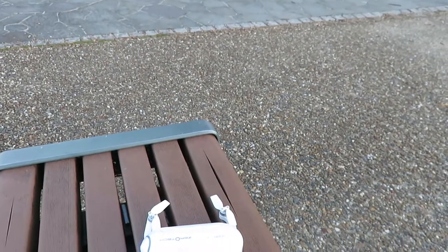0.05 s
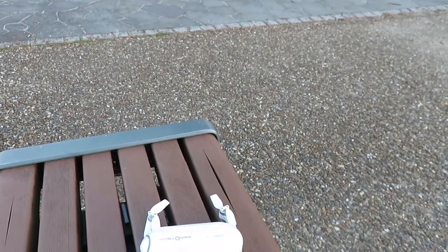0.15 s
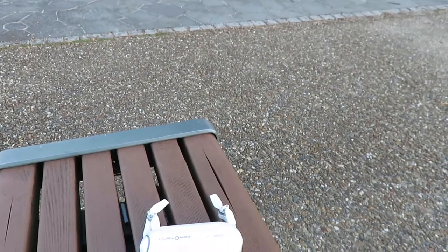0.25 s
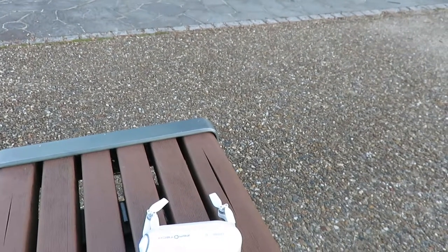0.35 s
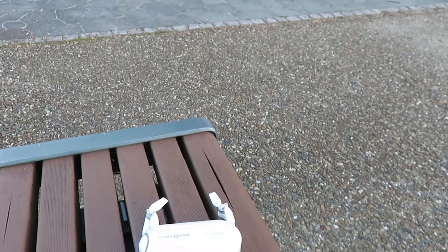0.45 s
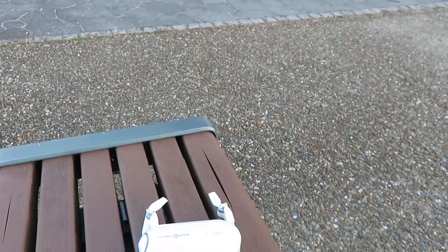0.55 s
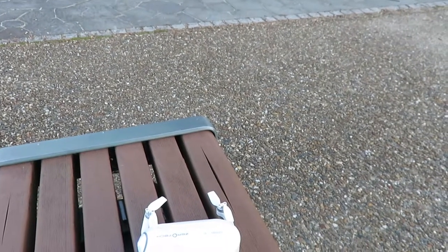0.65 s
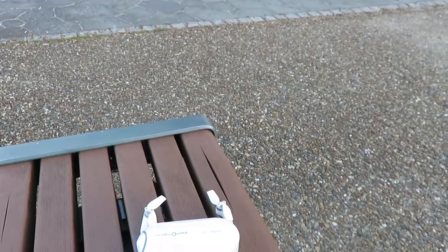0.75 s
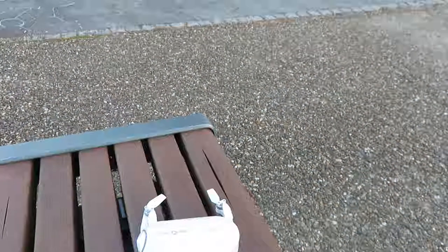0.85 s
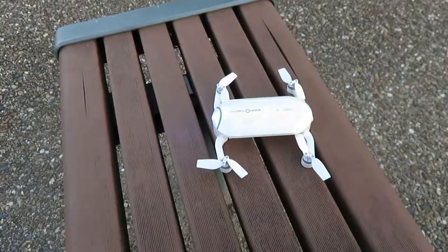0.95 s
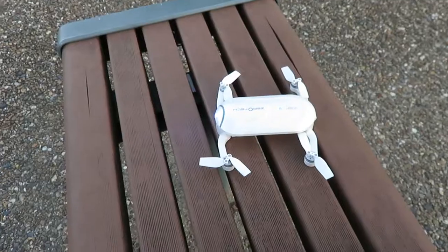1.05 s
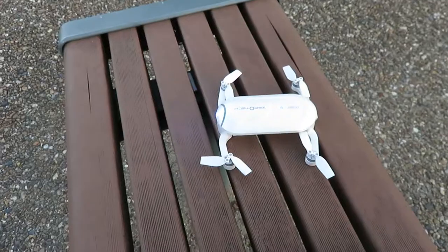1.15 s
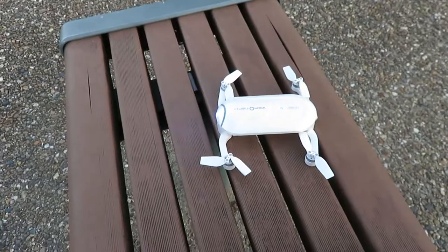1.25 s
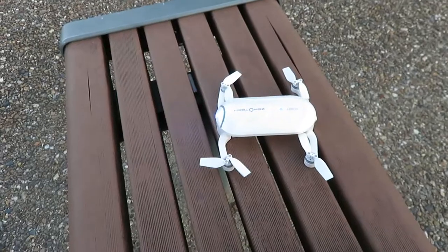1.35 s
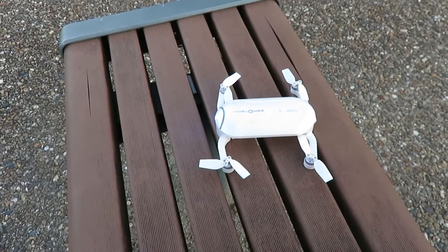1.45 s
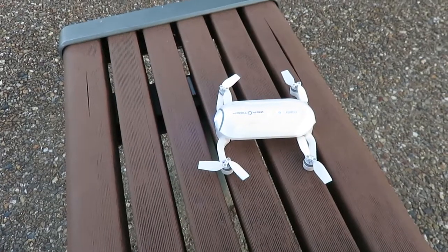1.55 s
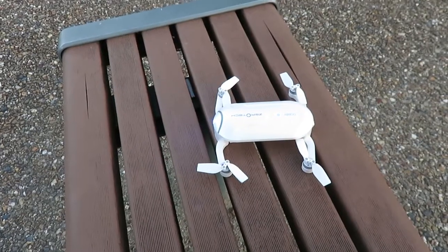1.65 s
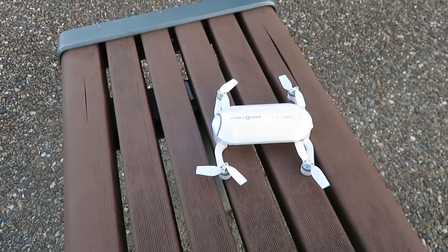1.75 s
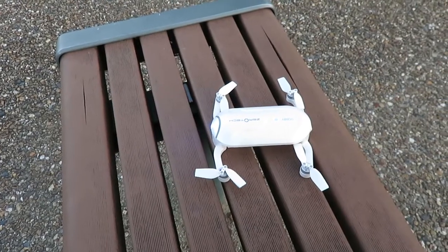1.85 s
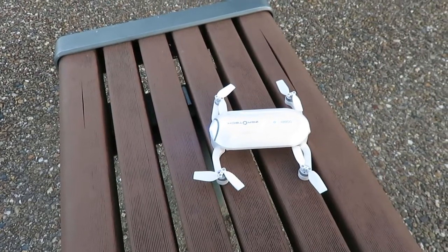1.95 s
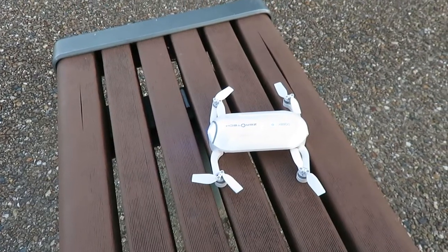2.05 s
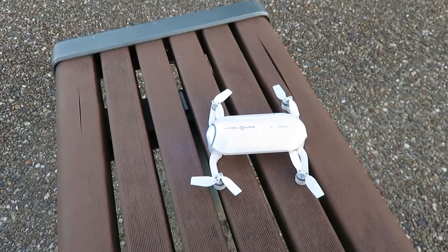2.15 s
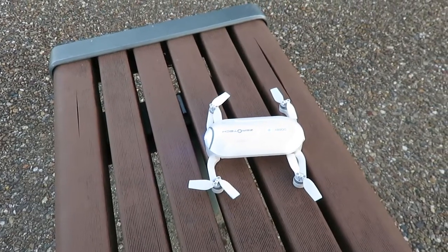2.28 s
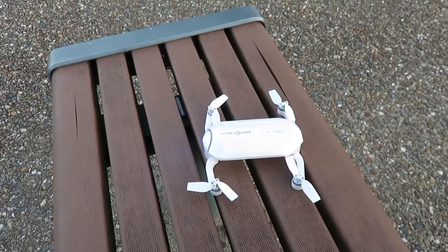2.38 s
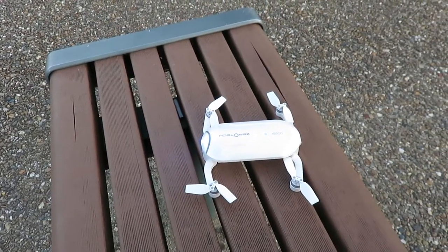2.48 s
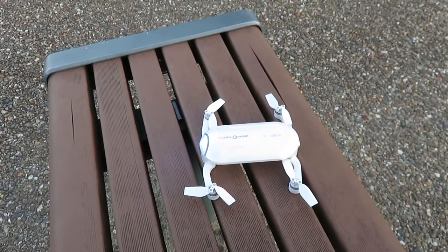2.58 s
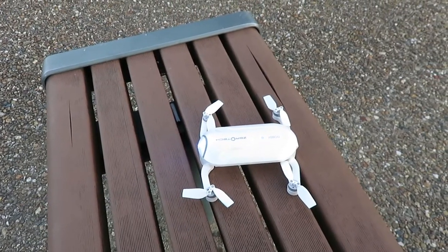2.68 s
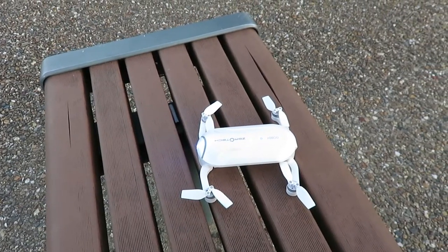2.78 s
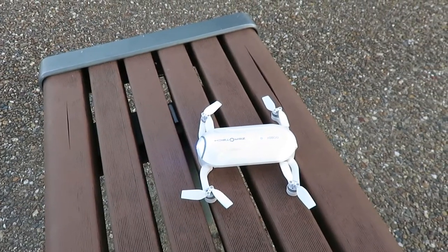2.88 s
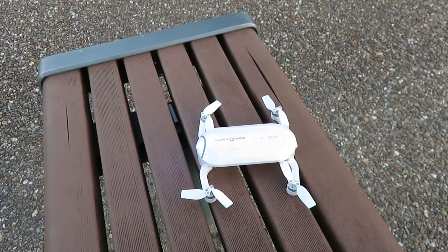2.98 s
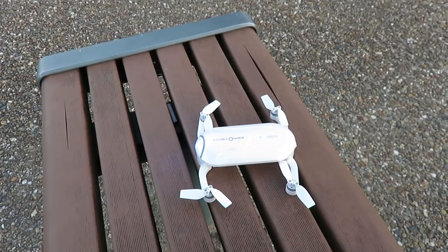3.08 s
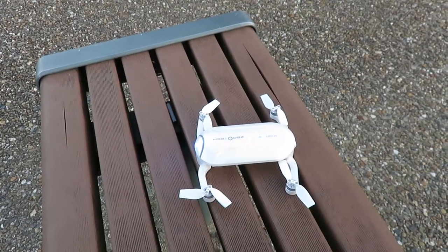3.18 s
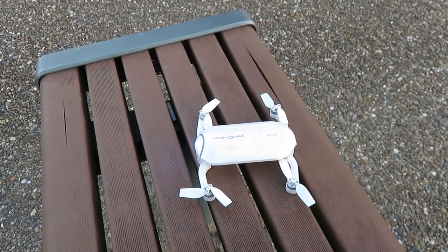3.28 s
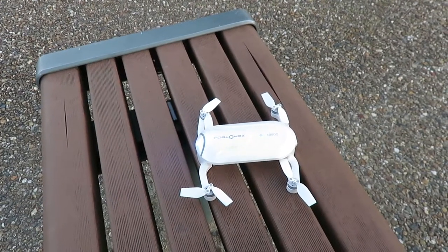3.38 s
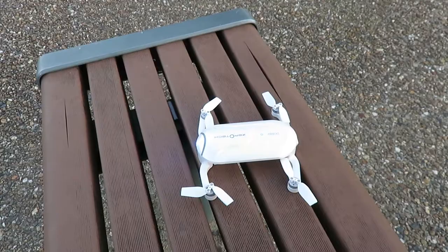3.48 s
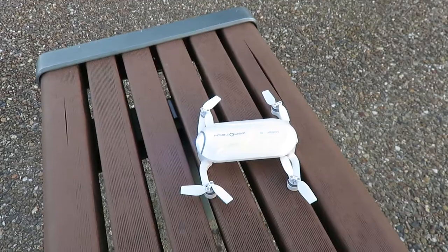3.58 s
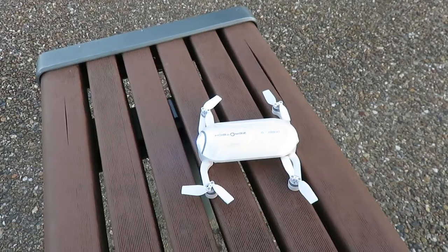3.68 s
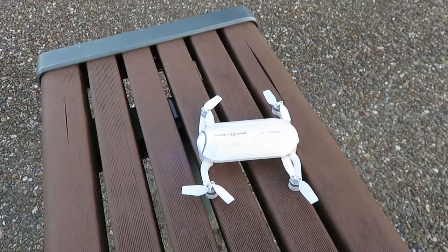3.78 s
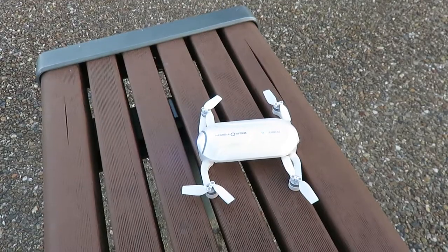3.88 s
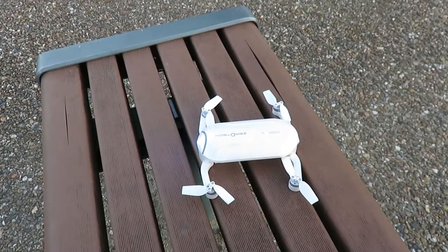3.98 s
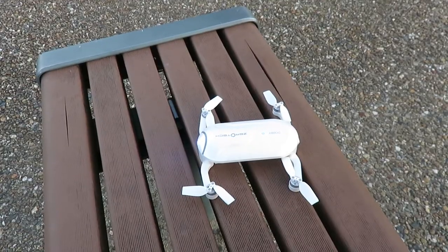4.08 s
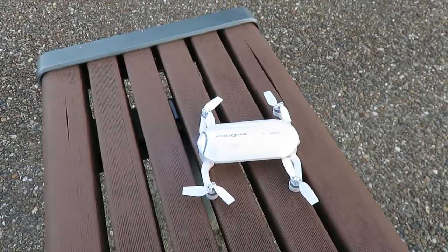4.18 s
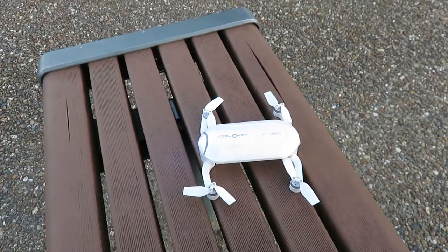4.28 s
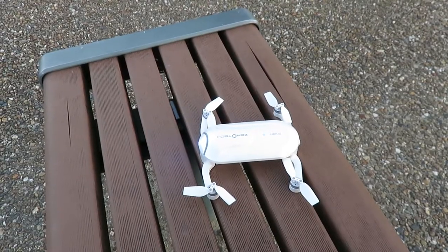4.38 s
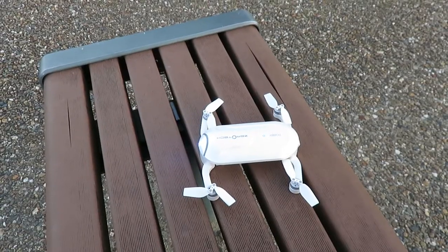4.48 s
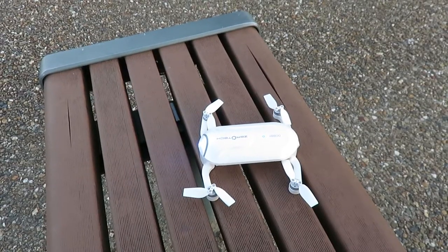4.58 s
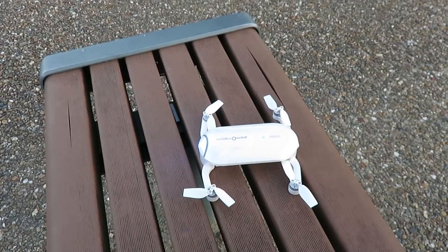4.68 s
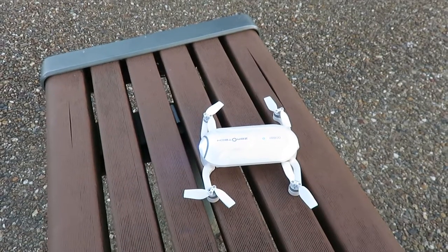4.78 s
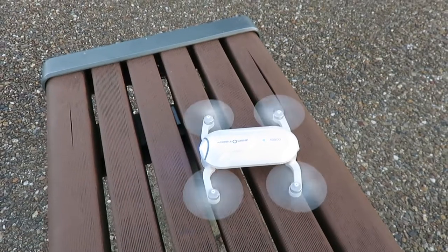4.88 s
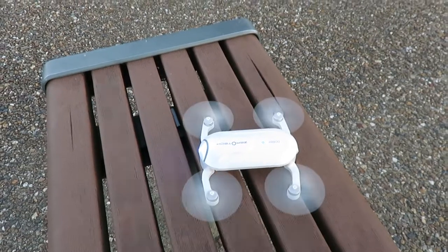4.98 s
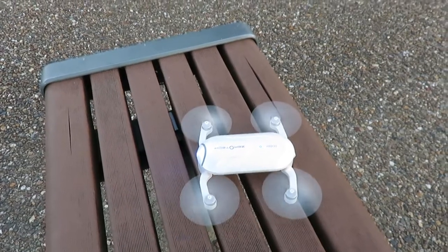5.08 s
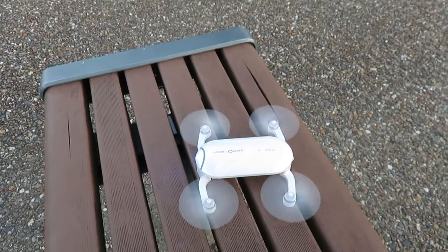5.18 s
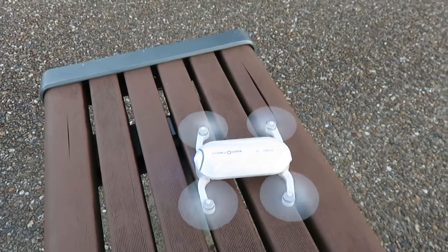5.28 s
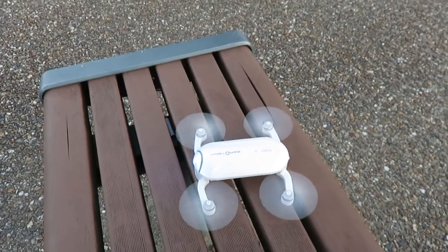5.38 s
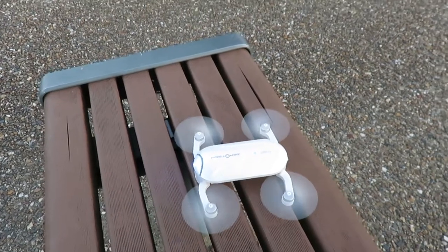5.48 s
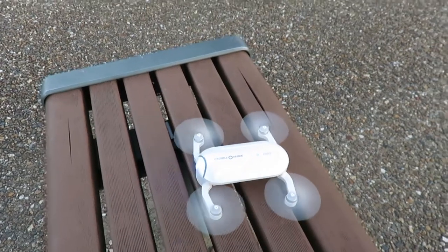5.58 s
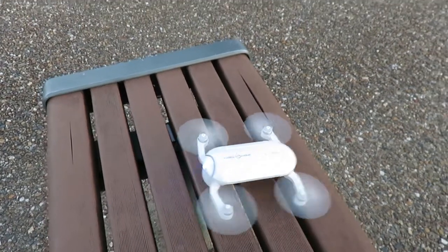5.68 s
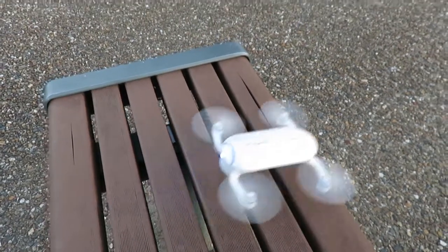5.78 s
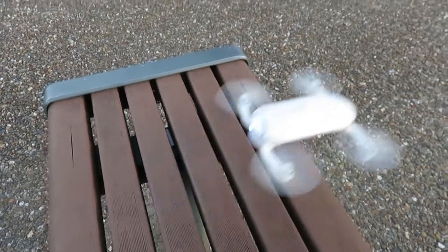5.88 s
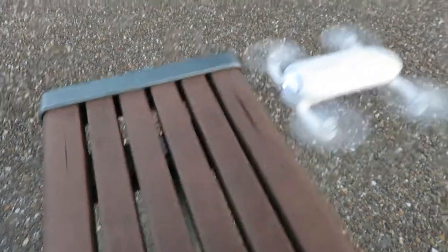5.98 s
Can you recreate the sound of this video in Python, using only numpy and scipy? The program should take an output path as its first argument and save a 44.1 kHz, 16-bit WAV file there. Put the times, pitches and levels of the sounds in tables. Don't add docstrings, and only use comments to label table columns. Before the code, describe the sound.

Close handheld microphone in an open paved place. A quiet, steady small-fan whine sits over low distant traffic and murmur, with a brief silent gap near one second and a light tap soon after. Far hum pulses come and go. Then a rapid burst of bright plastic snaps leads straight into four rotors spinning up, rough and beating, with rushing air as the drone rises and banks off while the background sinks.

```python
import sys
import numpy as np
from scipy import signal
from scipy.fft import rfft, irfft, next_fast_len
from scipy.io import wavfile
from scipy.ndimage import uniform_filter1d

SR = 44100
rng = np.random.default_rng(int(sys.argv[2]) if len(sys.argv) > 2 else 0)


def wrap_up_sound(samples):
    columns = np.atleast_2d(samples).T
    tamed = np.clip(columns, -1, 1)
    steps = np.round(tamed * 32767).astype(np.int16)
    wavfile.write(sys.argv[1], SR, steps)


def nominal_scale(level):
    x = np.asarray(level, float) / 20
    return 10 ** x


N = 266364
DROPOUT_START_S, DROPOUT_END_S = .8975, .918


def in_time(rows):
    s, *columns = np.transpose(rows)
    return [np.interp(np.arange(N) / SR, s, c) for c in columns]


def at_hz(points, hz):
    points = np.array(points)
    return np.interp(np.log(hz + 1), np.log(points[:, 0]), points[:, 1])


def drift(rate_hz, size=N):
    knots = rng.standard_normal(2000)[:int(size * rate_hz / SR) + 2]
    return np.interp(np.arange(size) * rate_hz / SR, np.arange(len(knots)), knots)


def peak_db(s, top_db, rise, fall):
    t = np.arange(N) / SR - s
    return top_db - np.where(t < 0, -rise * t, fall * t)


def lift_db(resonances, hz):
    return sum(db / (1 + (2 * (hz - centre) / width) ** 2) for centre, width, db in resonances)


def stereo_noise(spectrum, side, gate=1):
    size = next_fast_len(N)
    hz = np.arange(size // 2 + 1) * SR / size
    side_share = np.array([np.ones_like(hz), nominal_scale(at_hz(side, hz))])
    colour = nominal_scale(at_hz(spectrum, hz)) * side_share
    source = rng.standard_normal((2, N)) * gate
    mid, apart = irfft(rfft(source, size) * colour, size)[:, :N]
    return np.array([mid + apart, mid - apart]) / np.std(mid)


def ring(clicks, hz, t60):
    r, w = nominal_scale(-60 / (t60 * SR)), 2 * np.pi * hz / SR
    return signal.lfilter([0, np.sin(w)], [1, -2 * r * np.cos(w), r * r], clicks + 1e-18)


# multiple of the fan speed, level_db (rms)
FAN_ORDERS = [(6, -60), (11, -64), (13, -82), (14, -84), (16, -86), (18, -78), (19, -80), (21, -88),
              (24, -87), (30, -88), (31, -93), (36, -89), (37, -96), (40, -95), (42, -91), (45, -93),
              (46, -88), (47, -92), (48, -95), (51, -92), (52, -98), (54, -95), (56, -100), (58, -103),
              (61, -104)]


def fan():
    before = np.arange(N) / SR < DROPOUT_START_S
    fan_hz = np.where(before, 235.0, 235.75)
    turn = 2 * np.pi * np.cumsum(fan_hz) / SR + 0.0079 * drift(11.0)
    early_db = -4 * before
    out = np.zeros((2, N))
    for multiple, level_db in FAN_ORDERS:
        start, apart = rng.random(2) * [2 * np.pi, min(multiple / 12, 3)]
        gain = np.sqrt(2) * nominal_scale(level_db + 1 + 2.2 * drift(6.) + early_db * (multiple < 12))
        out += gain * np.sin(multiple * turn + start + np.array([[0], [apart]]))
    return out


# pitch_hz, side_minus_mid_db
AMBIENT_SIDE = [(25, -28), (60, -44), (110, -28), (200, -20), (380, -4), (700, -8), (1290, -9.5),
                (2380, -6.5), (4400, 4), (8120, 0), (15000, 1.5)]
# pitch_hz, level_db (per Hz)
RUMBLE = [(8.8, -45), (15, -21), (43, -4), (76, 0.5), (237, -6), (272, -8.5), (308, -10), (344, -16),
          (400, -18), (520, -33.5), (880, -120)]


def rumble():
    t = np.arange(N) / SR
    gust_db = 3 * np.exp(-np.abs(t - DROPOUT_END_S) / 0.14)
    level_db = np.where(t < DROPOUT_END_S, -41, -41.5 + gust_db)
    return nominal_scale(level_db + 1.0 * drift(5.29)) * stereo_noise(RUMBLE, AMBIENT_SIDE)


# pitch_hz, level_db (per Hz)
MURMUR = [(150, -61), (250, -15), (493, -11), (698, -8), (775, -7), (1200, -12), (1380, -9.5), (1730, -13),
          (2620, -17), (3580, -30.5), (4340, -29), (6470, -33.5), (12300, -40), (13900, -44), (16000, -74)]
# pitch_hz, level_db (per Hz)
EARLY_MURMUR = [(150, -38), (250, -11), (319, -10.5), (528, -11.5), (735, -8.5), (860, -9.5), (2050, -13),
                (3120, -27.5), (4340, -29.5), (10900, -40.5), (16000, -54)]


def murmur():
    late = nominal_scale(-49.5 + 0.32 * drift(14.0)) * stereo_noise(MURMUR, AMBIENT_SIDE)
    early = nominal_scale(-49.5) * stereo_noise(EARLY_MURMUR, AMBIENT_SIDE)
    return np.where(np.arange(N) / SR > DROPOUT_START_S, late, early)


def engine():
    t = np.arange(N) / SR
    firing_hz = 31.07
    cycle = (firing_hz * t + .41 + .01 * drift(5.)) % 1
    firing = (np.diff(cycle, prepend=0) < 0) * nominal_scale(1.5 * drift(30.))
    band = signal.butter(4, (1380, 2720), "band", fs=SR, output="sos")
    pulses = signal.sosfilt(band, firing + 1e-18)
    return nominal_scale(-62.5 - 4.5 * (t < DROPOUT_START_S)) * pulses / np.std(pulses)


# start_s, length_s, level_db
SHIMMER = [
    (.62, 0.36, -70),
    (1.82, 0.35, -70),
    (3.59, .004, -56),
]
# pitch_hz, level_db (per Hz)
SHIMMER_COLOUR = [(7000, -30), (10000, 0), (11000, 3), (13000, -7), (15000, -27)]


def shimmer():
    t = np.arange(N) / SR
    swell = sum(nominal_scale(db) * np.sin(np.pi * np.clip((t - s) / length, 0, 1)) for s, length, db in SHIMMER)
    return swell * stereo_noise(SHIMMER_COLOUR, AMBIENT_SIDE)


# start_s, length_s, start_hz, end_hz, level_db
TWITTERS = [(0.627, .04, 10700, 10300, -75), (0.725, .05, 10800, 10400, -75),
            (.755, .03, 12300, 11800, -76), (.80, .07, 12600, 11900, -80), (.79, .09, 14400, 13800, -86),
            (.83, .04, 11100, 10500, -84), (1.87, .04, 11000, 10800, -78), (1.935, .03, 12050, 12000, -78),
            (1.935, .03, 11000, 10850, -72), (1.99, .02, 11600, 11500, -83),
            (2.06, 0.022, 10700, 10800, -78.5), (2.13, .08, 10800, 9900, -80),
            (0.74, .016, 4840, 4700, -67), (.817, .016, 4900, 4900, -70), (.823, .016, 4070, 4000, -67),
            (3.895, 0.087, 4400, 4850, -76)]


def twitters():
    t, out = np.arange(N) / SR, np.zeros(N)
    for s, length, start_hz, end_hz, level_db in TWITTERS:
        during = slice(int(s * SR), int((s + length) * SR))
        part = (t[during] - s) / length
        phase = 2 * np.pi * length * (start_hz * part + (end_hz - start_hz) * part ** 2 / 2)
        out[during] += nominal_scale(level_db + 8.0) * np.sin(np.pi * part) * np.sin(phase)
    return out


# peak_s, level_db
HUM = [
    (1.0, -59),
    (1.47, -47.5),
    (1.76, -50.5),
    (2.6, -56),
    (2.74, -56),
    (3.05, -50.5),
    (3.38, -59),
    (3.97, -54),
    (4.3, -56),
    (4.9, -55),
]


def hum():
    t = np.arange(N) / SR
    rest_db, rise_db_per_s, fall_db_per_s = -71, 139, 70
    swell = nominal_scale(rest_db) + sum(nominal_scale(peak_db(s, db, rise_db_per_s, fall_db_per_s)) for s, db in HUM)
    tone = np.sin(2 * np.pi * 707 * t + 1.3 * drift(9.))
    return np.sqrt(2) * swell * nominal_scale(-4.5) * (t > DROPOUT_END_S) * tone


# pitch_hz, level_db, t60_s
TAP_MODES = [(1100, -32, .018), (2300, -29, .018)]


def tap():
    contact = np.zeros(N)
    contact[round(1.2608 * SR)] = 1
    contact = signal.lfilter([.25], [1, -.75], contact)
    return sum(nominal_scale(level_db) * ring(contact, hz, t60) for hz, level_db, t60 in TAP_MODES)


# pitch_hz, side_minus_mid_db
DRONE_SIDE = [(60, -29), (110, -35), (200, -36), (380, -15), (700, -31), (1290, -51), (2380, -57),
              (4400, -17.5), (8120, -7.5), (15000, -3.5)]
# start_s, ring_db, crack_db, crack_t60_s
SNAPS = [(4.9918, -22, -36, .04), (4.9945, -25, -36, .04), (5.0028, -19, .5, .005), (5.004, -12, -12, .02),
         (5.0062, -7, -15, .02), (5.0100, -12, -14, .025), (5.0125, -12, -15, .02),
         (5.0142, -13, -19, .015), (5.0197, -14, -14, .012), (5.0212, -8, -24, .025),
         (5.0232, -19, -28, .02)]
# pitch_hz, level_db, t60_s
BLADE = [(950, -9, .016), (1420, 1, .018), (1950, -4, .012), (2600, -8, .008), (5300, -6, .01)]
# pitch_hz, level_db (per Hz)
CRACK = [(290, -52), (500, -12), (1430, -8), (1810, -15), (2680, -0.5), (3330, -19), (5390, -7),
         (6710, -14), (13900, -11.5), (16400, -27)]


def snaps():
    t, rings = np.arange(N) / SR, np.zeros(N)
    swish_db = peak_db(4.99, -27.5, 1100, 750)
    envelope = nominal_scale(swish_db) * (t > 4.976)
    at = [round(row[0] * SR) for row in SNAPS]
    for hz, mode_db, t60 in BLADE:
        clicks = np.zeros(N)
        clicks[at] = nominal_scale(np.array(SNAPS)[:, 1] + mode_db) * rng.choice([-1, 1], len(at))
        soft_contact = signal.lfilter([.5], [1, -.5], clicks)
        rings += ring(soft_contact, hz, t60)
    for s, _, crack_db, t60 in SNAPS:
        envelope += (t >= s) * nominal_scale(crack_db - 60 * np.clip(t - s, 0, .2) / t60)
    no_bass = signal.butter(2, 700, "high", fs=SR, output="sos")
    rings = signal.sosfilt(no_bass, rings)
    dry_tick = signal.butter(2, 7000, "high", fs=SR, output="sos")
    rings += nominal_scale(-1) * signal.sosfilt(dry_tick, np.arange(N) == round(5.0029 * SR))
    return rings + 0.69 * envelope * stereo_noise(CRACK, DRONE_SIDE)


def banked():
    return np.clip((np.arange(N) / SR - 5.5) / .3, 0, 1)


def spinning():
    return np.clip((np.arange(N) / SR - 5.02) / 0.012, 0, 1)


# start_s, level_db
AIR = [(5.04, -78), (5.05, -55.5), (5.114, -39.5), (5.412, -28.5), (5.69, -29.5), (5.816, -26.5),
       (5.938, -22.5), (6.04, -28.5)]
# pitch_hz, level_db (per Hz)
DOWNWASH = [(53, -48), (90, -14.5), (229, -3.5), (471, -20), (669, -6.5), (757, -15), (1330, -0.5),
            (1460, -4.5), (2700, -5), (3500, -11.5), (4550, -25), (7700, -120)]


def downwash():
    wash_db = in_time(AIR)[0] + 2.5 - 3 * banked()
    first_stir_db = -37
    return spinning() * np.hypot(nominal_scale(wash_db), nominal_scale(first_stir_db)) * stereo_noise(DOWNWASH, DRONE_SIDE)


# pitch_hz, level_db (per Hz)
TIP_HISS = [(1650, -16), (2800, -2), (3040, -3), (3240, -18), (3570, -9.5), (4350, -4.5), (5710, -1.5),
            (6810, -8.5), (9000, -16), (11700, -40), (19800, -120)]
# pitch_hz, level_db (per Hz)
SIZZLE = [(5180, -23), (8800, -3), (10300, -5.5), (11700, -0.5), (12800, -1.5), (15500, -12.5),
          (16000, -16), (16200, -23)]


def edge_noise(chopping):
    sizzle_db, tilting_s = in_time(AIR)[0], np.arange(N) / SR - 5.6
    tilt_takes_s = 0.23
    tilt_db = -9.5 * np.clip(tilting_s / tilt_takes_s, 0, 1) ** 2
    level_out_db = 27 * np.clip(tilting_s - tilt_takes_s, 0, 1)
    hiss_db = sizzle_db + 8.5 + tilt_db + level_out_db
    hiss = nominal_scale(hiss_db + 1.0 * drift(40.)) * stereo_noise(TIP_HISS, DRONE_SIDE, chopping)
    sizzle = nominal_scale(sizzle_db + 1.1 * drift(40.)) * stereo_noise(SIZZLE, DRONE_SIDE, chopping)
    return spinning() * (hiss + sizzle)


# start_s, blade_pass_hz, load_db (rms)
ROTORS = [
    [(5.06, 257, -53.6), (5.13, 335, -42.7), (5.44, 481, -30.7), (5.64, 586, -32.9), (5.77, 620, -40.4),
     (5.89, 703, -41.5), (5.93, 755, -45.0), (5.97, 730, -51.1), (6.04, 721, -38.5)],
    [(5.06, 240, -46.4), (5.13, 322, -46.1), (5.44, 436, -38.3), (5.53, 483, -43.1), (5.7, 547, -39.1),
     (5.79, 538, -42.1), (5.93, 673, -43.3), (5.97, 655, -51.3), (6.04, 648, -45.0)],
    [(5.06, 174, -65.0), (5.11, 227, -65.0), (5.17, 263, -54.9), (5.67, 485, -39.2), (5.79, 601, -29.9),
     (5.87, 628, -30.2), (5.93, 682, -32.7), (5.97, 663, -30.5), (6.04, 661, -39.3)],
    [(5.06, 180, -58.1), (5.15, 275, -48.5), (5.35, 360, -45.8), (5.6, 515, -40.5), (5.7, 608, -40.7),
     (5.79, 671, -34.3), (5.87, 690, -38.8), (5.93, 752, -31.4), (6.04, 722, -39.5)],
]
# multiple, then level_db of rotors 1 to 4
STRONG_ORDERS = [(1, -2.6, 5, 1, 3), (1.5, -20.8, -17.9, -19, -5.8), (2, -3.5, -12.1, 6.5, -2),
                 (3, -4.1, -9.1, 9.5, 0.8), (4, -6.2, -4.9, 1.1, -5.8), (5, -9.1, -10.2, 1.9, -9.7)]
# multiple, then level_db of rotors 1 to 4
BANKED_ORDERS = [(1, 7, 1.8, -6.5, 0), (1.5, -16.3, -19.9, -30, -5), (2, -1.2, -0.9, -3, 0.5),
                 (3, 4, 2.7, -7.5, -11), (4, 1, -7, -7.5, -15), (5, -8, -6.9, -11.5, -5.8)]
# multiple, level_db (against the rotor)
BLADE_ORDERS = [(.5, -23), (2.5, -21), (3.5, -24), (6, -18), (7, -20), (8, -19), (9, -24), (10, -21),
                (11, -22)]
# pitch_hz, width_hz, level_db
BODY = [(315, 78, 5.4), (583, 84, 6.3), (822, 151, 4.2), (1044, 159, 4.1), (1234, 69, -6.1),
        (1280, 162, 8.4), (1521, 209, 2.5), (1865, 135, 8.4), (2180, 345, 9.0), (2590, 510, 10.3),
        (3060, 381, 9.0)]
# pitch_hz, width_hz, level_db
FRAME = [(340, 70, 6), (740, 120, 11), (1080, 130, 8), (2450, 600, 7), (3400, 600, -3), (5400, 1400, 3)]


def blade_tones():
    start = int(ROTORS[0][0][0] * SR)
    size = N - start
    bank = banked()[start:]
    tones, chopping = np.zeros(N), np.ones(N)
    for k, rotor in enumerate(ROTORS, start=1):
        blade_hz, load_db = np.array(in_time(rotor))[:, start:]
        partials = []
        for standing, turned in zip(STRONG_ORDERS, BANKED_ORDERS):
            angle_db = standing[k] + bank * (turned[k] - standing[k])
            strong_db = load_db + .4 + angle_db + lift_db(BODY, standing[0] * blade_hz)
            partials.append((standing[0], strong_db))
        power = sum(nominal_scale(db) ** 2 for _, db in partials)
        loud_db = 10 * np.log10(power)
        turn = 2 * np.pi * np.cumsum(blade_hz) / SR + .1 * drift(45., size)
        chopping[start:] += .3 * nominal_scale(.5 * (loud_db + 18.0)) * np.cos(turn)
        for multiple, order_db in BLADE_ORDERS:
            partials.append((multiple, loud_db + order_db + lift_db(FRAME, multiple * blade_hz)))
        for multiple, level_db in partials:
            flutter_db = 1.25 * (1 + multiple / 4) * drift(18., size)
            gain = np.sqrt(2) * nominal_scale(level_db + .5 + flutter_db)
            tones[start:] += gain * np.sin(multiple * turn + 2 * np.pi * rng.random())
    tones[start:] *= np.minimum(np.arange(size) / (0.022 * SR), 1)
    change = np.concatenate([[0], np.diff(tones)])
    return tones + .2 * change * [[1], [-1]], chopping


def scene():
    t = np.arange(N) / SR
    duck_db = -6 * np.clip((t - 5.02) / .06, 0, 1) - 49 * np.clip(t - 5.4, 0, 1)
    surroundings = rumble() + murmur() + engine() + shimmer() + twitters() + hum() + tap()
    tones, chopping = blade_tones()
    drone = snaps() + downwash() + edge_noise(chopping) + tones
    return nominal_scale(duck_db) * (fan() + surroundings) + drone


def thin_treble(x):
    mid, side = (x[0] + x[1]) / 2, (x[0] - x[1]) / 2
    hz, _, bins = signal.stft(mid, SR, nperseg=2048)
    usual = uniform_filter1d(np.abs(bins), size=24, axis=0)
    limit = 1.2 * np.clip((hz[:, None] - 5000) / 4000., 0, 1)
    quiet = np.mean(usual, axis=0) < nominal_scale(-75)
    weak = (np.abs(bins) < limit * usual) & quiet
    mid = signal.istft(bins * ~weak, SR, nperseg=2048)[1][:N]
    return np.array([mid + side, mid - side])


def roll_off(x):
    return signal.sosfilt(signal.butter(12, 16500, fs=SR, output="sos"), x)


def record(dry):
    t = np.arange(N) / SR
    live = (t < DROPOUT_START_S) | (t > DROPOUT_END_S)
    cut_top = signal.cheby2(12, 60, 16400, fs=SR, output="sos")
    heard = signal.sosfilt(cut_top, np.tanh(dry))
    mix = thin_treble(heard) * live
    return roll_off(mix)


dry = scene()
out = record(dry)
wrap_up_sound(out)
```